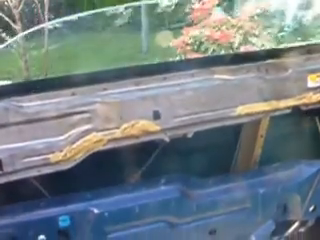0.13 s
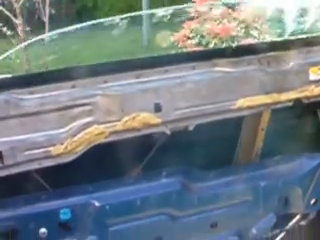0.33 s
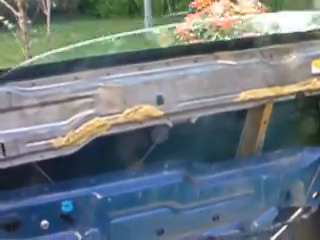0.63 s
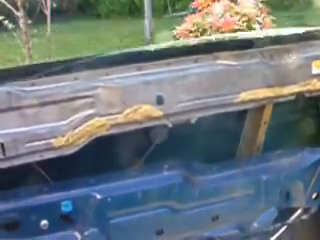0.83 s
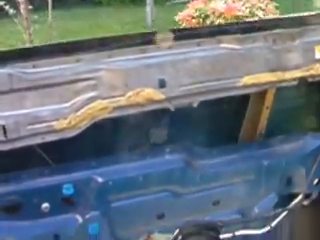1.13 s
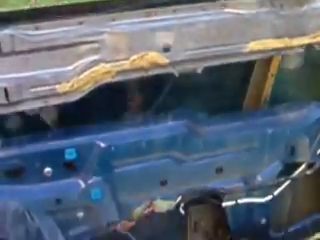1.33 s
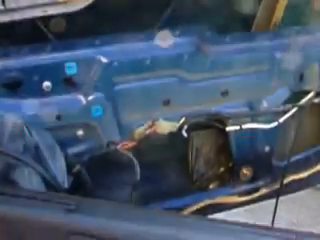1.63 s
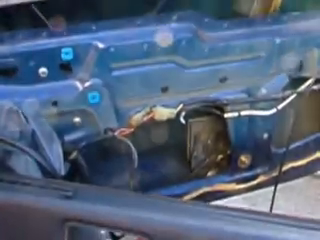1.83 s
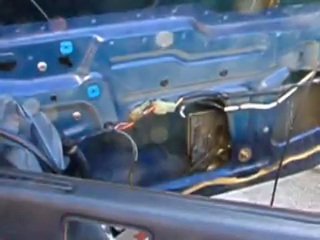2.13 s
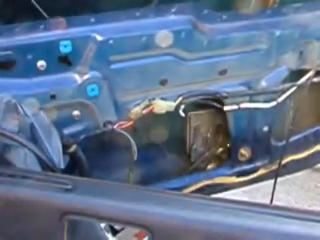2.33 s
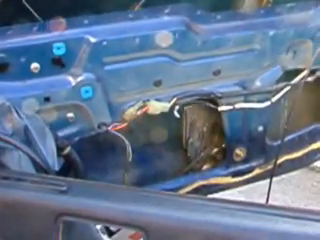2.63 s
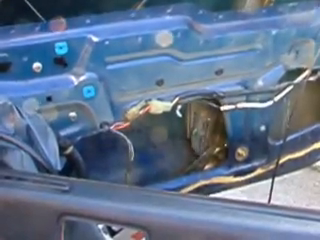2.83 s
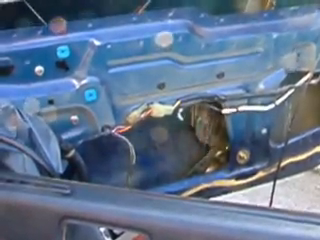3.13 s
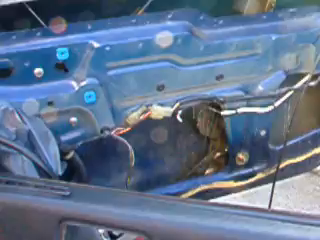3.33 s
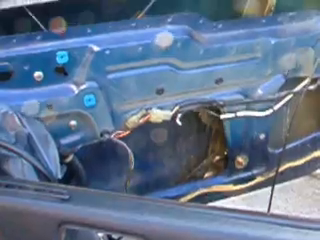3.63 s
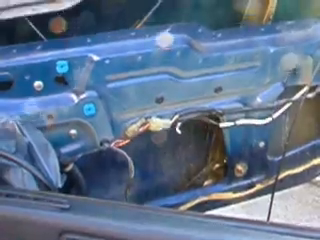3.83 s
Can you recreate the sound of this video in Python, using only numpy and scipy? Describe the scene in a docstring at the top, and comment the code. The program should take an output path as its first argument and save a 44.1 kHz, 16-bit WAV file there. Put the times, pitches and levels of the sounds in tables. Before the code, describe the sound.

An electric window motor whines, clunks to a stop, then restarts inside a stripped car door.

```python
"""A whining, rumbling motor winds a window up in a stripped car door, close by, outdoors.
It stalls at the top with a run of clunks and is switched off; a second later it restarts with a clank
and winds the glass down. Gears rumble, brushes hiss and the commutator whines with the rotor's turn.
Knocks ring the door panel and lifting arm; the glass chafes, sticks and slips in its rubber seals."""
import sys
import numpy as np
from scipy import signal
from scipy.fft import rfft, irfft
from scipy.io import wavfile
from scipy.ndimage import map_coordinates

SR = 44100
rng = np.random.default_rng(int(sys.argv[2]) if len(sys.argv) > 2 else 0)


def log_audio(samples):
    """Write samples as a 16-bit WAV file to the path given in sys.argv[1]."""
    # one column per channel
    frames = np.atleast_2d(samples).T
    # limit to full scale, then quantise
    limited = np.clip(frames, -1, 1)
    pcm = np.round(limited * 32767).astype(np.int16)
    wavfile.write(sys.argv[1], SR, pcm)


N = 176400
T = np.arange(N) / SR
FREQS = np.maximum(np.arange(N // 2 + 1) * SR / N, 1)
SEGMENTS = 8  # commutator segments per rotor turn


def from_db(db):
    """Decibels to gain."""
    return 10 ** (np.asarray(db) / 20)


def rms_one(x):
    """Scale to unit power."""
    return x / np.sqrt(np.mean(x ** 2) + 1e-20)


def in_time(rows):
    """Columns of a time curve at every sample."""
    times, *columns = np.transpose(rows)
    return [np.interp(T, times, column) for column in columns]


def at_hz(points, hz):
    """Interpolate over log frequency."""
    freqs, values = np.transpose(points)
    return np.interp(np.log(hz), np.log(freqs), values)


def noise(gains):
    """Unit-power noise shaped by spectral gains."""
    return rms_one(irfft(rfft(rng.standard_normal(N)) * gains, N))


def peak(hz, width_hz):
    """Spectral gains of one resonance."""
    return 1 / (1 + (2 * (FREQS - hz) / width_hz) ** 2)


def drift(rate_hz):
    """Unit-power low-passed noise."""
    return noise(1 / (1 + (FREQS / rate_hz) ** 2))


def phase_of(hz):
    """Phase [rad] of a moving frequency."""
    return 2 * np.pi * np.cumsum(hz) / SR


def swell(start_s, attack_s, length_s, release_s):
    """Linear attack; exponential release from start_s + length_s."""
    attack = np.clip((T - start_s) / attack_s, 0, 1)
    return attack * np.exp(-np.clip((T - start_s - length_s) / release_s, 0, 40))


def clicks(times_s, gains):
    """One impulse at each time."""
    out = np.full(N, 1e-18)
    np.add.at(out, (np.asarray(times_s) * SR).astype(int), gains)
    return out


def dying(power, t60_s):
    """Exponential decay of power impulses."""
    return signal.lfilter([1], [1, -from_db(-120 / (t60_s * SR))], power)


def struck(modes, times_s, db=0):
    """Each blow rings each mode with random sign and 1 dB of scatter."""
    out = 0
    for hz, mode_db, t60_s in modes:
        radius, angle = from_db(-60 / (t60_s * SR)), 2 * np.pi * hz / SR
        gains = from_db(db + mode_db + rng.normal(0, 1.0, len(times_s)))
        blows = clicks(times_s, gains * rng.choice([-1, 1], len(times_s)))
        out += signal.lfilter([0, np.sin(angle)], [1, -2 * radius * np.cos(angle), radius ** 2], blows)
    return out


def outdoor_air():
    """Steady air and hiss."""
    # (frequency [Hz], relative level [dB])
    spectrum = [(15, -41.5), (25, -8.5), (108, -4.5), (415, -12.5), (458, -10.5), (518, -12), (1220, -14),
                (6900, -19), (8600, -29.5), (11200, -67.5)]
    return from_db(-50) * noise(from_db(at_hz(spectrum, FREQS)))


def shell_bumps():
    """Soft low thuds of the door shell."""
    # (time [s], level [dB])
    bumps = [(1.07, -41.5), (2.225, -47), (2.72, -46)]
    envelope = sum(from_db(db) * swell(s, 0.021, 0.006, release_s=0.036) for s, db in bumps)
    return envelope * noise(peak(72, width_hz=63))


def glass_sliding():
    """The glass chafes in its seal and swishes along its channel."""
    # (time [s], level [dB])
    chafes = [(.03, -45), (.23, -47)]
    # (time [s], length [s], level [dB])
    swishes = [(.58, 0.24, -45.5), (2.75, 0.25, -47)]
    chafe_s = 0.087
    chafe = sum(from_db(db) * swell(s, chafe_s / 2, chafe_s, chafe_s / 2) for s, db in chafes)
    swish = sum(from_db(db) * swell(s, length_s, length_s, 0.07) for s, length_s, db in swishes)
    return chafe * noise(peak(790, width_hz=100)) + swish * noise(peak(6900, width_hz=2300))


def arm_buzz():
    """The loose arm buzzes as the glass sinks."""
    # (time [s], level [dB])
    buzzes = [(3.565, -50), (3.75, -46)]
    buzz_s = 0.019
    envelope = sum(from_db(db) * swell(s, buzz_s / 2, buzz_s, buzz_s) for s, db in buzzes)
    return envelope * noise(peak(3020, width_hz=68))


def stall_sizzle():
    """Thin high sizzle while the motor pushes against the stop."""
    # (centre [Hz], width [Hz], level [dB])
    bands = [(6900, 400, -58), (5260, 300, -61)]
    sizzle = sum(from_db(db) * noise(peak(hz, width_hz)) for hz, width_hz, db in bands)
    return sizzle * swell(start_s=1.085, attack_s=0.02, length_s=0.187, release_s=0.0087)


def gear_squeal():
    """The gears creak as they take up the load; overtones die first."""
    # (harmonic number, level [dB])
    harmonics = [(1, -33), (2, -37.5), (3, -40), (4, -45)]
    start_s, start_hz, sag_hz_per_s, jitter, roughness = 2.46, 1031, 1500, 0.055, 0.48
    pitch_hz = start_hz - sag_hz_per_s * np.clip(T - start_s, 0, 0.1)
    phase = phase_of(pitch_hz * (1 + jitter * drift(303)))
    out = 0
    for k, db in harmonics:
        tone = np.sqrt(2) * from_db(db) * np.sin(k * phase) * (1 + roughness * drift(150))
        out += tone * swell(start_s, attack_s=0.006, length_s=0.0065, release_s=0.042 / k)
    return out


def seal_judders():
    """Stick-slip in the seal: a short gliding groan, then the pane shudders."""
    # (time [s], length [s], level [dB], pitch [Hz], sag [Hz/s], relative shudder [dB])
    slips = [(0.756, 0.016, -35, 385, 589, -2.5), (1.038, 0.027, -35.5, 327.7, -1500, -5.5),
             (1.13, 0.02, -32, 370, 1000, -19.5), (1.174, 0.077, -39.5, 305, 450, -5.5),
             (2.488, 0.057, -36.5, 384.7, 304, -12), (2.648, 0.018, -35, 350, 1799, -1),
             (3.086, 0.021, -28.5, 407, 497, -6.5), (3.334, 0.017, -29, 400, 750, -3),
             (3.673, 0.033, -29, 419.3, 497, -6.5), (3.853, 0.015, -31.5, 400, 604, -4.5)]
    # (frequency [Hz], relative level [dB])
    pane_spectrum = [(50, -19.5), (90, -21.5), (120, 9), (165, -7.5), (230, 2.5), (330, -4), (430, -4),
                     (600, -13), (4000, -43.5)]
    rough = 1 + 0.062 * drift(80)
    pane = noise(from_db(at_hz(pane_spectrum, FREQS)))
    out, rise_s = 0, 0.016
    for s, length_s, db, hz, sag, shudder_db in slips:
        tone = np.sqrt(2) * np.sin(phase_of(hz - sag * np.clip(T - s, 0, 0.1)))
        groan = tone * rough * swell(s, 0.0075, length_s, release_s=0.006)
        shudder = from_db(shudder_db) * pane * swell(s, rise_s, length_s + rise_s, release_s=0.048)
        out += from_db(db) * (groan + shudder)
    return out


def end_stop():
    """The lifter rings as it hits the stop and pings as it settles."""
    # both: (frequency [Hz], level [dB], t60 [s])
    stop_modes = [(747, -28, 0.21), (1960, -30, 0.17), (2590, -28, 0.089), (3340, -35, .07),
                  (4540, -40, 0.067)]
    ping_modes = [(4210, -45, 0.067), (4480, -42, .06)]
    return struck(stop_modes, times_s=[1.059]) + struck(ping_modes, times_s=[1.612])


def knocks():
    """Each knock cracks, rings the panel and rattling arm, and clatters in the door; treble dies first."""
    # (time [s], level [dB], relative bass [dB], relative treble [dB], relative arm ring [dB])
    hits = [(1.032, -35, 17.5, -2, -17), (1.057, -28.5, 0, -5, -1.5), (1.065, -28.5, 2.5, -11, -7),
            (1.077, -28, 4, -10.5, -13), (1.151, -39.5, 20, -45, -24), (1.2101, -24.5, 7, -38, -29),
            (1.228, -34, 5, -42, -31), (1.244, -33, 12, -40, -30), (1.2962, -18, -10.5, -10, -19),
            (1.3, -21.5, 4.5, -10, -33), (1.611, -35.5, 12, -1.5, -23), (2.4155, -36.5, 1, 8.5, -19),
            (2.462, -38, -2, -10, 1), (2.493, -28.5, 3, -14, -4), (2.532, -28, 1, 5, 6),
            (2.552, -29, 9, 0, 2.5), (2.566, -22.5, 6.5, -8.5, -8.5), (2.576, -25, -2, -20, -2.5)]
    # both: (frequency [Hz], relative level [dB], t60 [s])
    panel_modes = [(285, -18.5, 0.13), (393, -8, 0.12), (470, -14, 0.042), (724, -16.5, 0.11),
                   (788.5, -11.5, 0.1), (1534, -17, 0.071)]
    arm_modes = [(1966, -8, 0.12), (2830, -4.5, 0.087), (2970, -1.5, 0.1), (5260, -10.5, 0.045)]
    # (frequency [Hz], relative level [dB])
    cavity_spectrum = [(50, -17), (120, -19), (250, -5), (400, -2), (660, -5), (790, -2.5), (960, -3),
                       (1900, -3.5), (3000, -4.5), (4500, -6), (7000, -8.5), (9000, -21.5)]
    # (frequency [Hz], t60 [s])
    cavity_decay = [(100, 0.38), (500, 0.15), (2000, 0.095), (7000, 0.037)]
    attack_s, bass_hz, treble_hz, crack_db, crack_t60_s = 0.001964, 510, 2580, -11, 0.011
    times_s, db, bass_db, treble_db, arm_db = np.transpose(hits)
    panel = struck(panel_modes, times_s + attack_s, db + bass_db / 2)
    arm = struck(arm_modes, times_s + attack_s, db + arm_db)
    out = panel + arm * (1 + 0.55 * drift(115))
    centres_hz = np.geomspace(60, 8000, 14)
    colour = from_db(at_hz(cavity_spectrum, FREQS))
    pole = np.exp(-1 / (attack_s * SR))
    for hz, selector in zip(centres_hz, np.eye(len(centres_hz))):
        band = colour * np.sqrt(np.interp(np.log(FREQS), np.log(centres_hz), selector))
        band_share = np.sum(band ** 2) / np.sum(colour ** 2)
        band_db = db + bass_db / (1 + (hz / bass_hz) ** 4) + treble_db / (1 + (treble_hz / hz) ** 4)
        blows = clicks(times_s, from_db(band_db) ** 2)
        clatter = dying(blows, at_hz(cavity_decay, hz))
        crack = from_db(crack_db) ** 2 * dying(blows, crack_t60_s)
        power = signal.lfilter([1 - pole], [1, -pole], clatter + crack)
        out += noise(band) * np.sqrt(power * band_share)
    return out


def friction(commutator_phase, gains):
    """Unit-power rubbing noise; part of it repeats on every rotor turn."""
    locked_share = 0.23
    turns = commutator_phase / (2 * np.pi * SEGMENTS)
    surface = irfft(np.exp(2j * np.pi * rng.random(int(N / turns[-1] / 2))))
    locked = rms_one(map_coordinates(surface, [turns % 1 * len(surface)], order=3, mode="grid-wrap"))
    rubbing = np.sqrt(locked_share) * locked + np.sqrt(1 - locked_share) * rng.standard_normal(N)
    return rms_one(irfft(rfft(rubbing) * gains, N))


def motor(speed, levels, spectrum, partials, flutter_db):
    """Gears rumble and brushes scrape through the resonances of the can; the commutator whines."""
    # can and bracket: (centre [Hz], width [Hz], twice the lift at centre [dB])
    resonances = [(754, 120, 1.5), (1410, 100, 4.5), (2500, 29, 5), (3010, 70, 6.5), (3880, 56, 11.5),
                  (4830, 120, 11), (5200, 220, 9), (6920, 110, 8.5)]
    # (time [s], gain [dB])
    whine_gain = [(.4, -8.5), (.6, -3.5), (1.03, 0.5), (1.12, -23), (2.5, -46), (2.68, 2), (3.08, 0.5),
                  (3.16, -8), (3.7, -10), (3.9, -0.5)]
    wobble, brush_beat, rotor_beat, grit_db, crossover_hz = 0.002493, 0.19, 0.076, 0.6, 1250
    phase = phase_of(in_time(speed)[0] * (1 + wobble * drift(20)))
    gear_db, brush_db = in_time(levels)
    can_db = sum(db * (peak(hz, width) - peak(hz, 4 * width) / 2) for hz, width, db in resonances)
    body = from_db(at_hz(spectrum, FREQS) + can_db)
    lowpass = 1 / np.sqrt(1 + (FREQS / crossover_hz) ** 6)
    bass_cut = FREQS / np.hypot(FREQS, 60)
    gears = friction(phase, body * lowpass * bass_cut) * from_db(gear_db + grit_db * drift(30))
    beat = 1 + brush_beat * np.cos(phase) + rotor_beat * np.cos(phase / SEGMENTS)
    scrape = friction(phase, body * np.sqrt(1 - lowpass ** 2))
    brushes = scrape * rms_one(beat * from_db(grit_db * drift(150))) * from_db(brush_db)
    whine = sum(np.sqrt(2) * np.sin(k * phase / SEGMENTS) * from_db(db + flutter_db * drift(9))
                for k, db in partials)
    running = (T >= speed[0][0]) & (T <= speed[-1][0])
    return gears + brushes + whine * running * from_db(in_time(whine_gain)[0])


def winding():
    """The motor raises the glass, then lowers it."""
    # (time [s], commutator rate [Hz])
    speed_up = [(0, 521.6), (.55, 509.1), (1.03, 509.1), (1.1, 438.8)]
    speed_down = [(2.5, 429.7), (2.62, 562), (2.7, 561.6), (2.78, 542.8), (2.95, 531), (3.1, 523.8),
                  (3.3, 536.8), (3.6, 537), (3.85, 541), (4, 550)]
    # (time [s], gear rumble [dB], brush hiss [dB])
    levels_up = [(0, -45.5, -43), (.38, -43.5, -44), (.55, -43.5, -40), (1.03, -40.5, -41),
                 (1.08, -41, -54), (1.25, -49, -65), (1.36, -44, -74), (1.45, -76, -92)]
    levels_down = [(2.41, -60, -92), (2.44, -42.5, -48), (2.52, -38.5, -49), (2.6, -40.5, -43.5),
                   (2.7, -46.5, -41), (2.9, -43.5, -42), (3.5, -41.5, -43.5), (4, -44, -45)]
    # friction: (frequency [Hz], relative level [dB])
    spectrum_up = [(35, -41), (60, -4.5), (91, -15), (123, -1.5), (155, -12.5), (179, -0.5), (210, -9.5),
                   (345, 2), (639, -10), (754, -2), (1260, -9), (1550, -12), (3050, -11), (4800, -16.5),
                   (6810, -16), (8200, -26.5), (10700, -51)]
    spectrum_down = [(35, -25.5), (60, -3), (87, -16.5), (123, -4.5), (161, -16.5), (359, -3), (479, -13),
                     (531, -3.5), (639, -14.5), (785, -4), (1010, -11), (1550, -12), (4520, -14.5),
                     (6810, -17.5), (8200, -28), (10700, -43)]
    # whine and gear buzz: (multiple of rotor rate, level before whine gain [dB])
    partials_up = [(11.5, -54.5), (12, -57), (21, -57), (24, -51), (25, -60.5), (35.5, -59), (37, -58.5),
                   (39, -54), (47.25, -54)]
    partials_down = [(8, -55.5), (16, -47), (24, -65.5)]
    up = motor(speed_up, levels_up, spectrum_up, partials_up, flutter_db=3)
    down = motor(speed_down, levels_down, spectrum_down, partials_down, flutter_db=2)
    return up + down


def scene():
    """Up, stall, pause, down; mono."""
    mix = winding() + glass_sliding() + arm_buzz() + knocks() + end_stop() + seal_judders()
    return (mix + gear_squeal() + stall_sizzle() + shell_bumps() + outdoor_air())[None]


def record(dry):
    """Steep treble cut."""
    stopband_db, stopband_hz = 60, 9500
    return signal.sosfilt(signal.cheby2(12, stopband_db, stopband_hz, fs=SR, output="sos"), dry)


dry = scene()
out = record(dry)
log_audio(out)
```